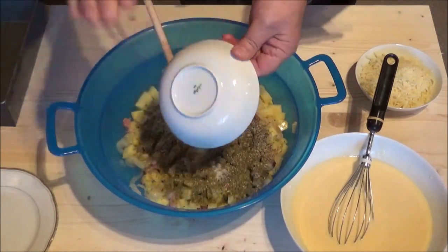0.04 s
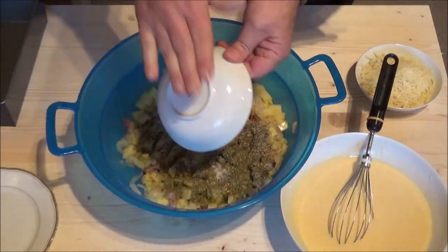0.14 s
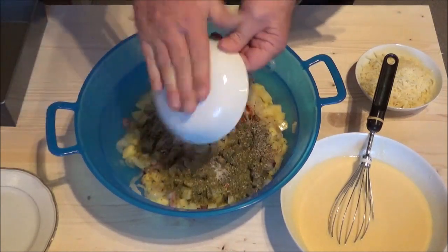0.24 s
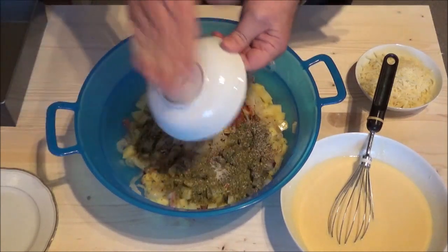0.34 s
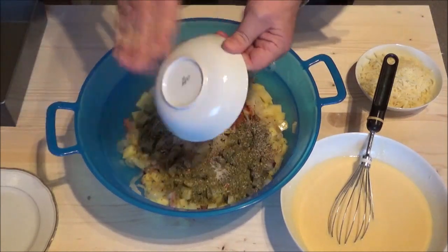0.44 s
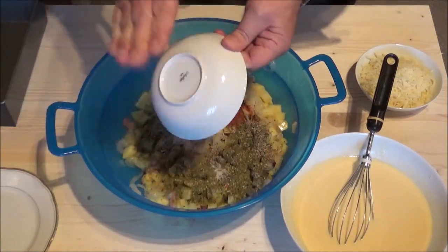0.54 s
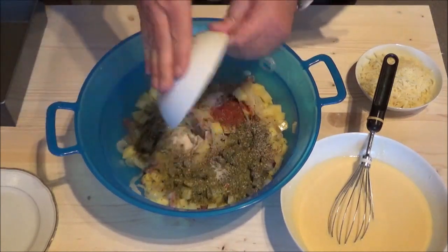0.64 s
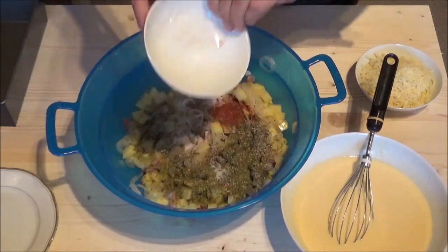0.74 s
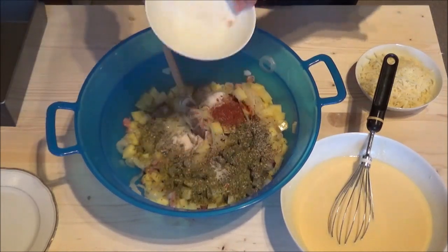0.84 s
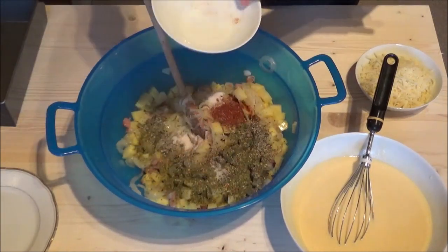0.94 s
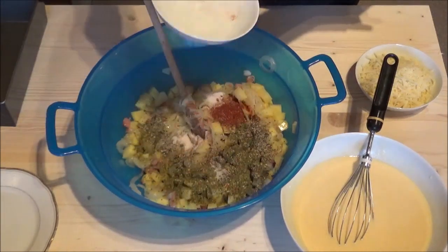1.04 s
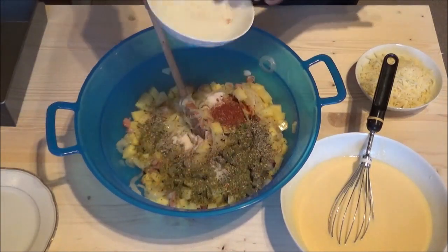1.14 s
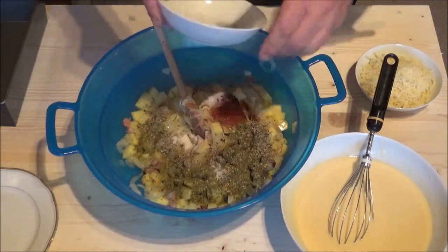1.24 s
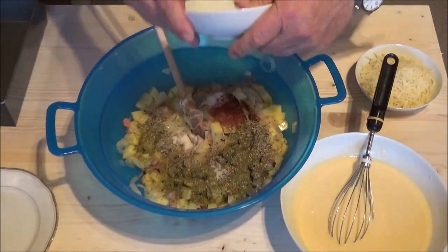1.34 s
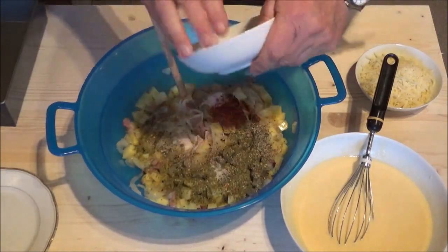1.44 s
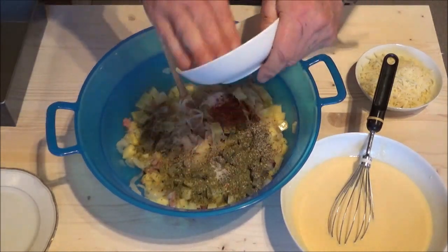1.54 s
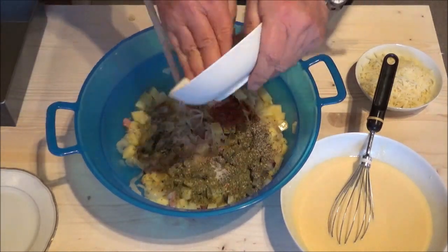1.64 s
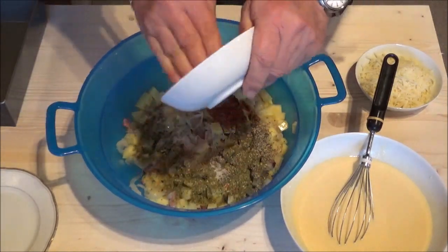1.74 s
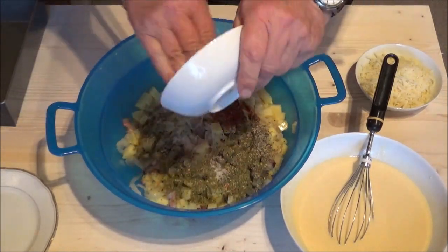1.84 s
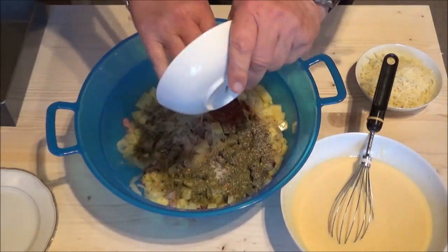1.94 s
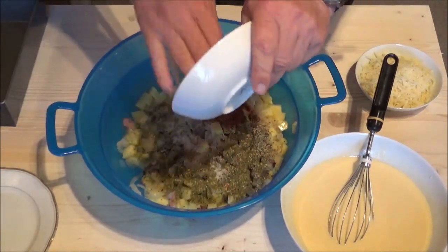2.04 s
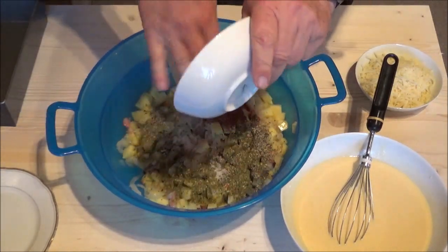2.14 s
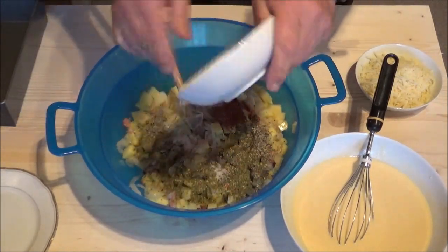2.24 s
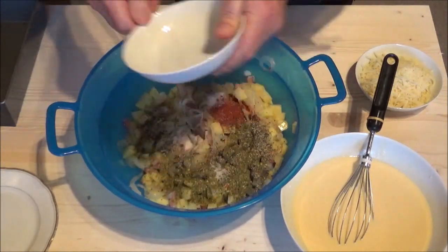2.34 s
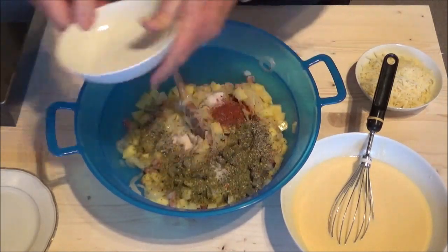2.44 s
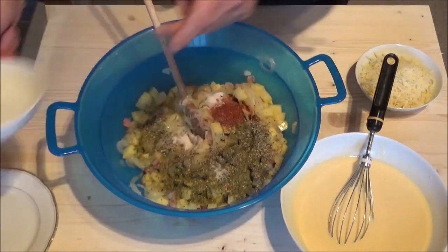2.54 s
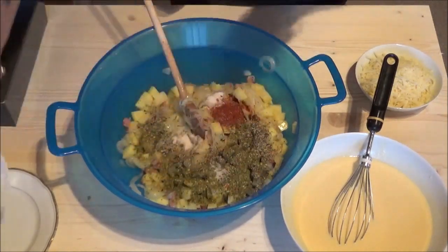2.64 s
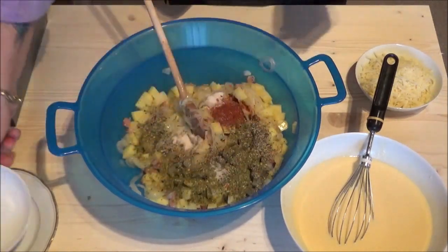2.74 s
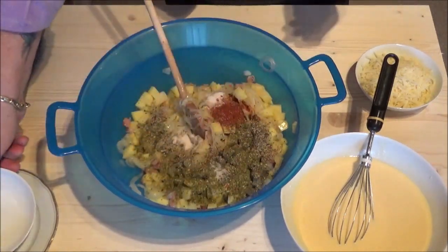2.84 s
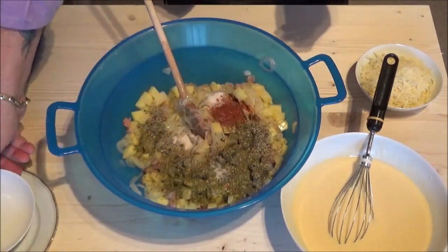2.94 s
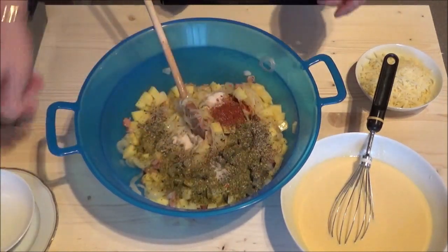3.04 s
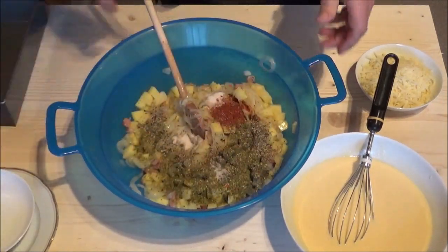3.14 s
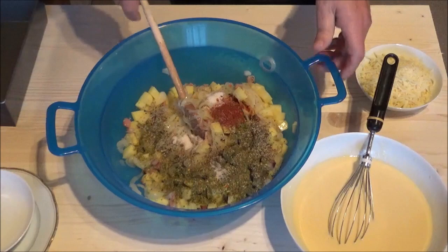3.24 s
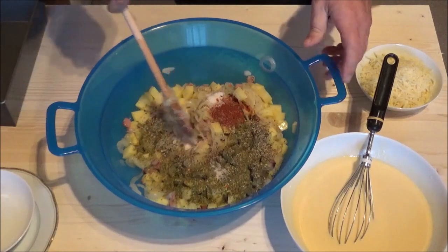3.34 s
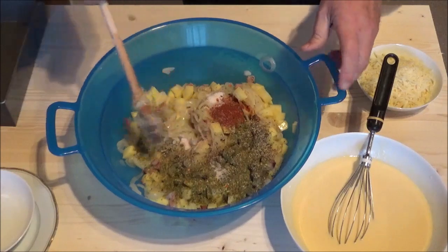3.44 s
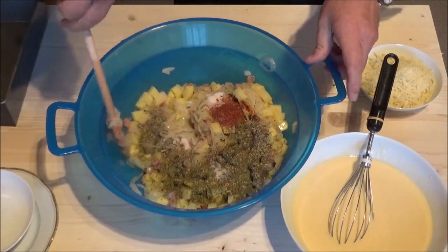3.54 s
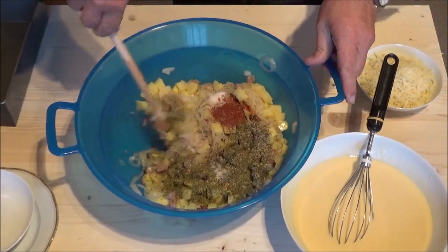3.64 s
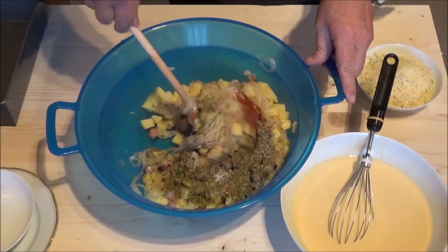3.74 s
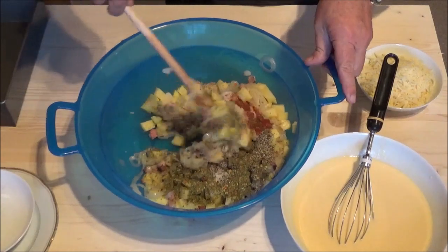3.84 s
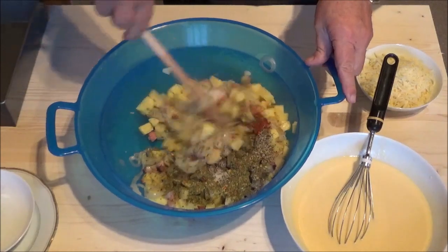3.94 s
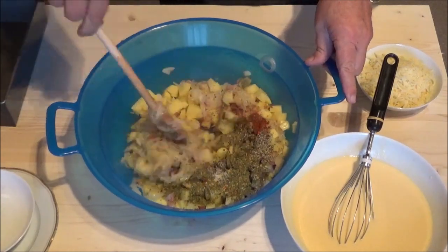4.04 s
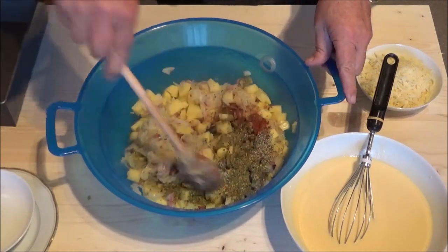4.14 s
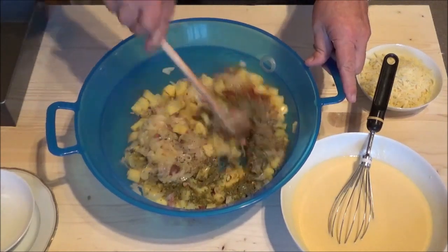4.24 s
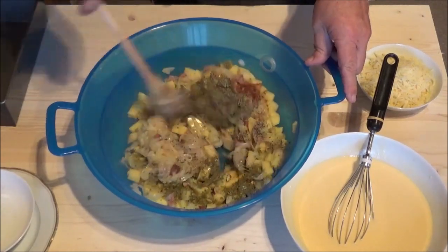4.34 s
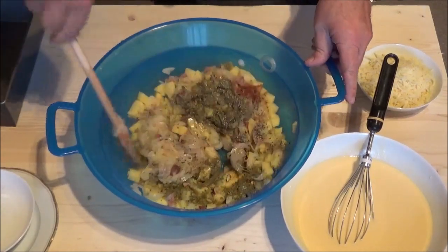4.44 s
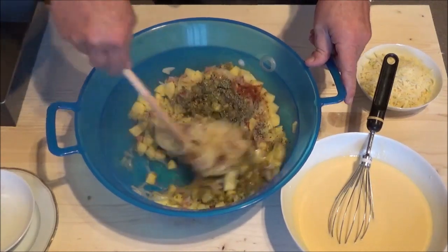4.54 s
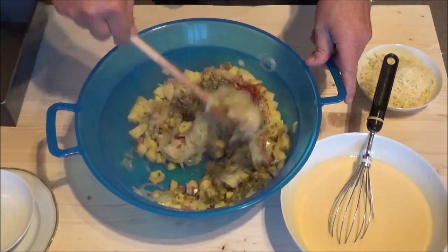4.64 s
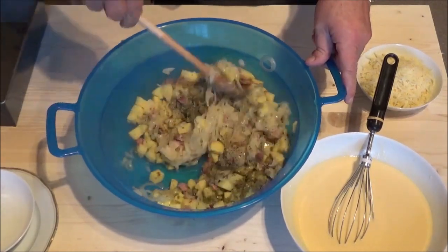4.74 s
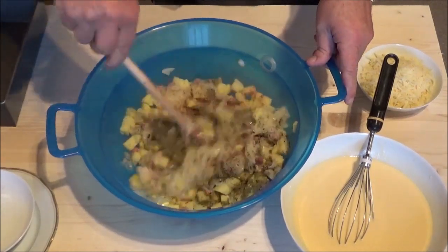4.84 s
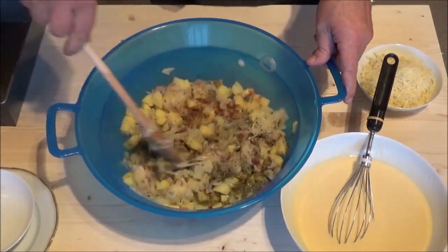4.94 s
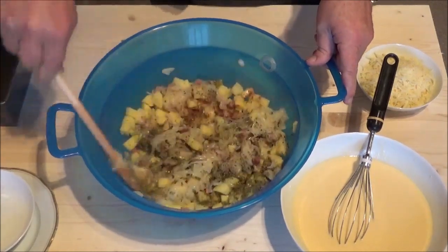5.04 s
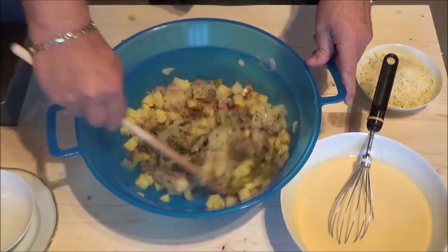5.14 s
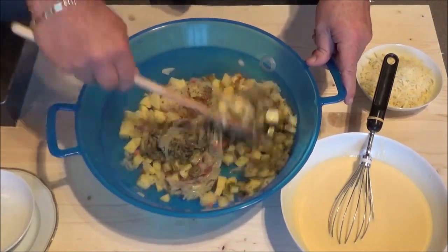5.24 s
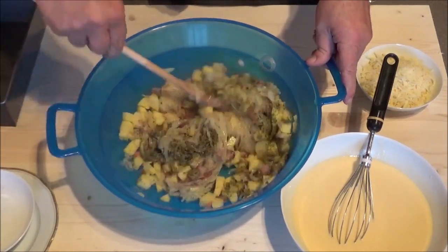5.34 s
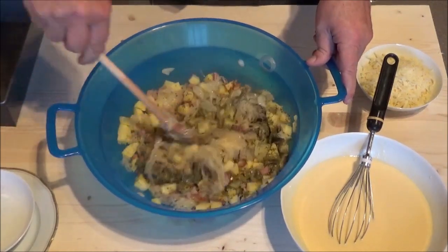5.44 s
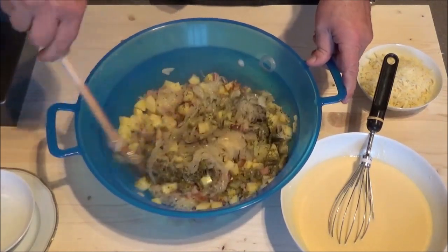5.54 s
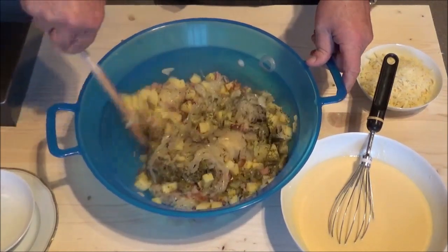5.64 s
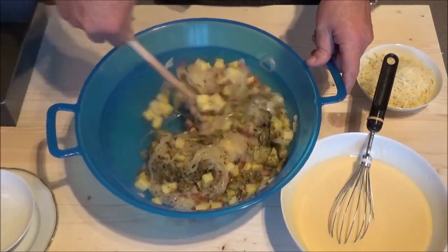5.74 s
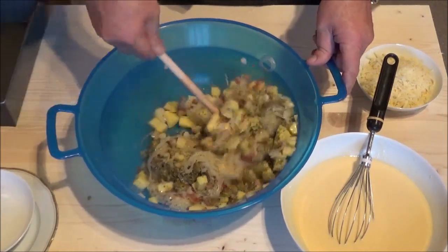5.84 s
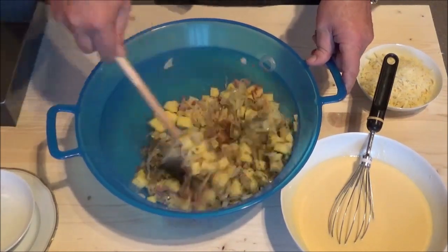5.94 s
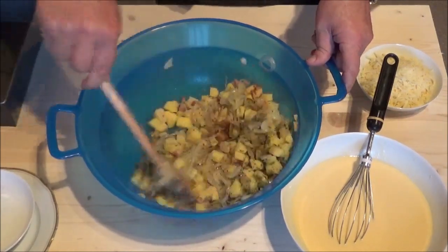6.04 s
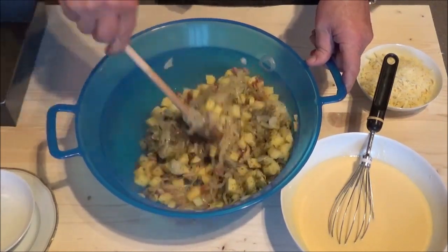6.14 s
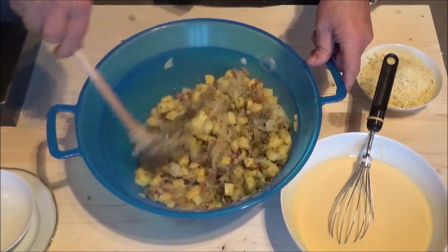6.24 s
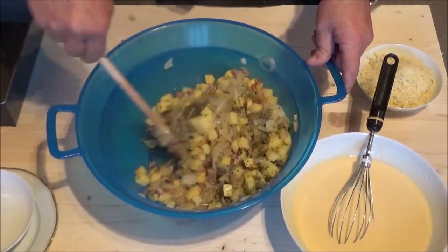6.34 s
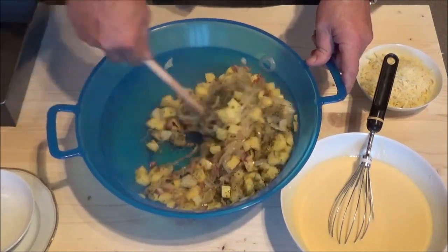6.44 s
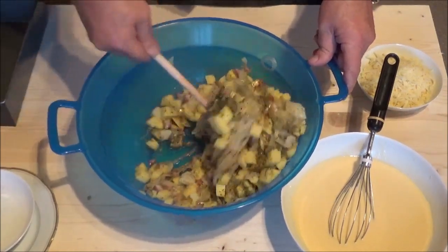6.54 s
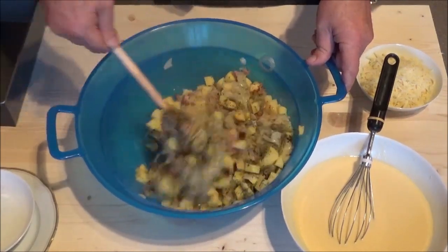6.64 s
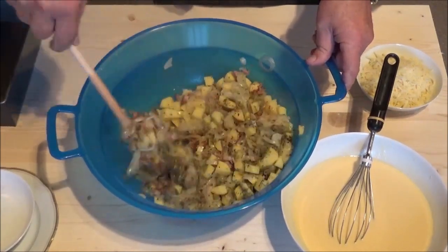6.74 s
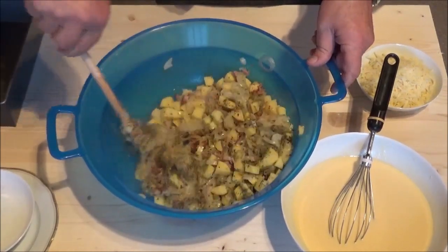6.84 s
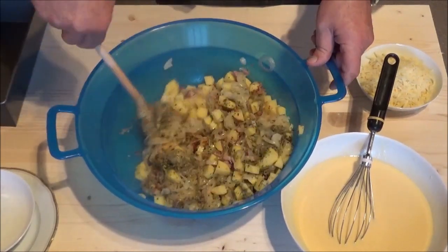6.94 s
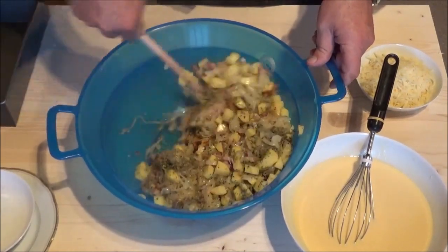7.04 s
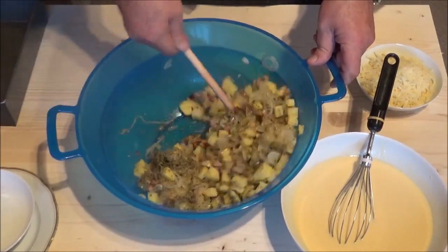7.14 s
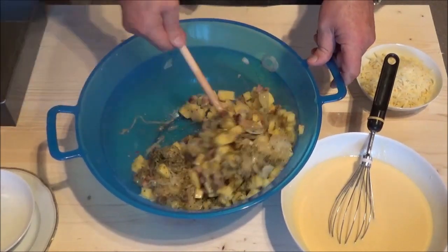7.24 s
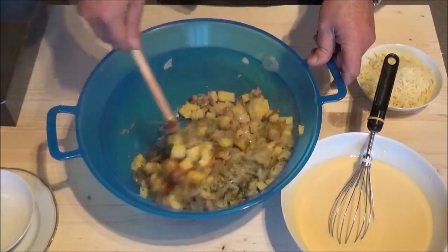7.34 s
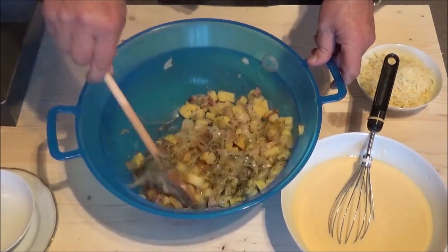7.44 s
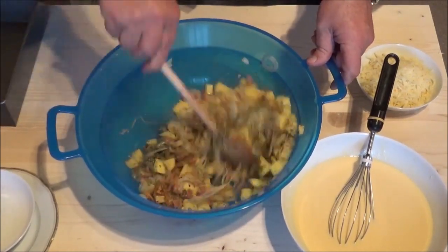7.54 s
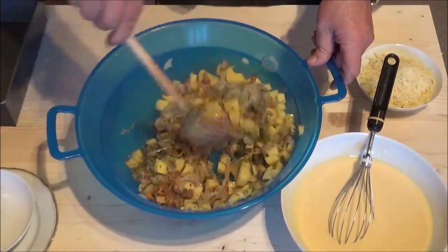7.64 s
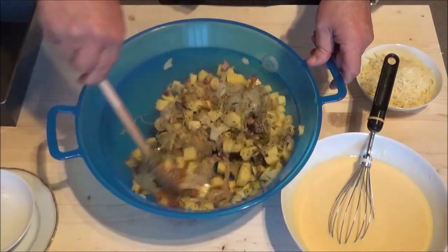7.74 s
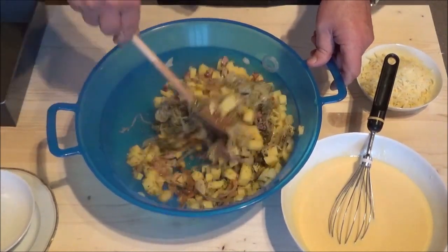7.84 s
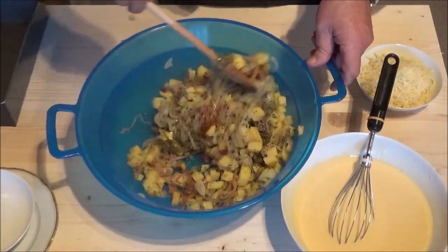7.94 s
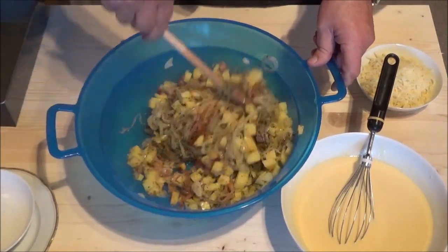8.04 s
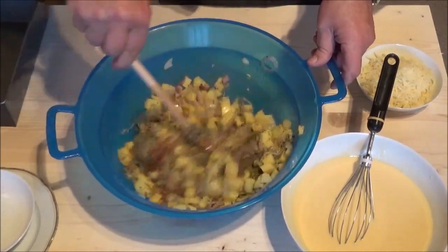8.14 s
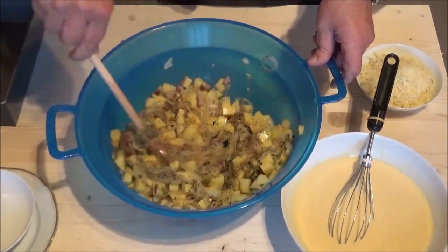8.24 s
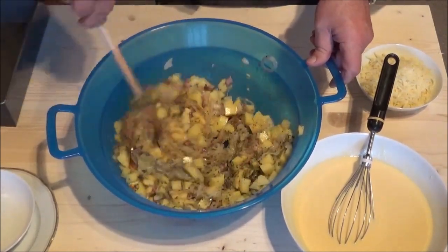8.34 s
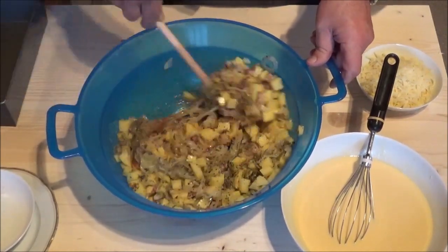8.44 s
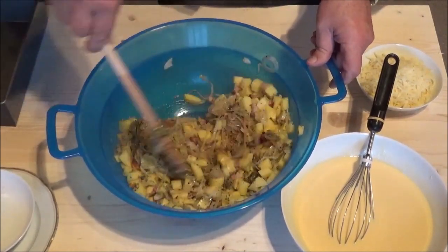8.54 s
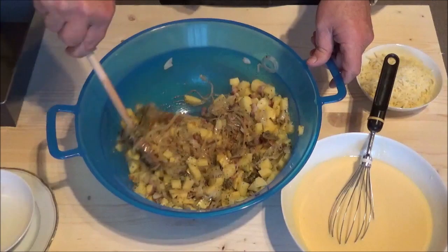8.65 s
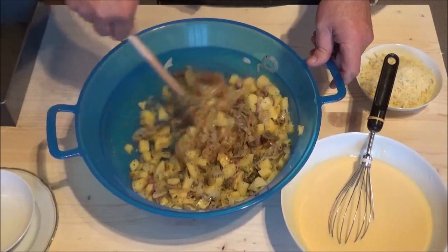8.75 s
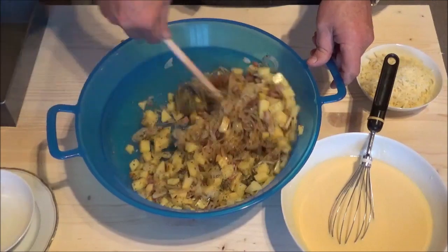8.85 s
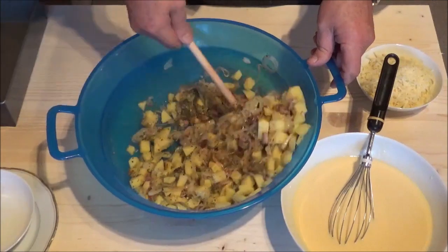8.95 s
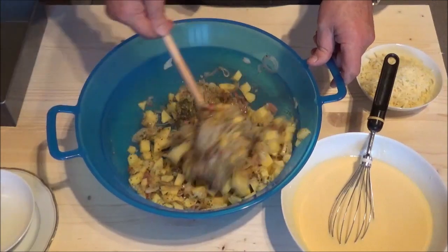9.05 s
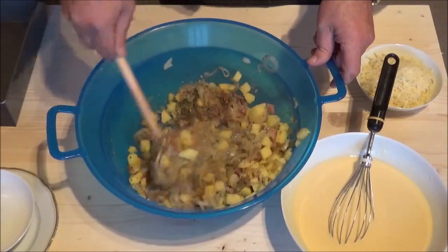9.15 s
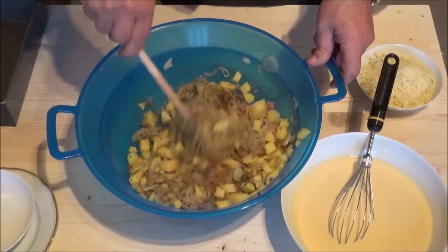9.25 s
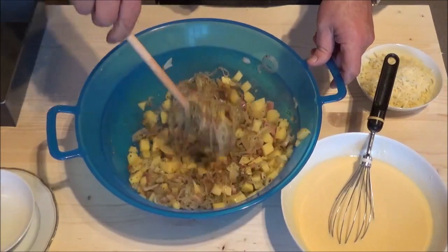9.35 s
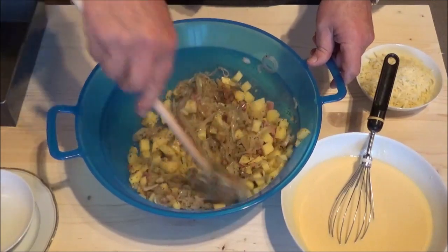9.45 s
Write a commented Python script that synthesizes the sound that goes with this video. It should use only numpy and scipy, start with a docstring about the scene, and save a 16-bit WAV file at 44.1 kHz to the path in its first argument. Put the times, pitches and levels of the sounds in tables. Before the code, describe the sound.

Close stereo in a small kitchen with a short echo and faint steady hiss. From 0.14 to 0.6 seconds, five quick palm slaps crack on an upturned china bowl, about eight a second, ringing hollow with varying tone. A soft wiping rustle follows near 0.76; between 1.0 and 2.2 come faint hollow rubs, a gritty finger slide and a few small china ticks. A thin scratch at 2.65 leads to a bright landing on a plate at 2.8, slightly left, with two rocking taps and a brief rattle to 3.3. From 3.5 to the end near 9.5, a wooden spoon stirs moist diced vegetables in a wide pan: two to four pushes a second, wet crackling squelches, low tumbling, scrapes, gurgles and irregular woody knocks. Stronger knocks come around 5.6, 6.3 and 7.1, juddering scuffs near 5.8-6, a sharp clack at 8.8 and a final firm knock at 9.47.

```python
"""First a hand slaps spices out of an upturned china bowl over a faint hiss: sharp cracks and hollow rings.
Fingers then wipe and tick on the bowl (coloured grains of noise), and it lands on a plate and rattles still.
Last, a wooden spoon stirs moist diced vegetables in a wide pan: cracks and pan rings make the knocks,
crowds of tiny clicks make the squelch, scrape and tumble, and short flurries make the scuffs and gurgles.
All this happens in a small kitchen, whose echo is noise that dies away."""
import sys
import numpy as np
from scipy import signal
from scipy.fft import rfft, irfft
from scipy.io import wavfile

SR = 44100
rng = np.random.default_rng(int(sys.argv[2]) if len(sys.argv) > 2 else 0)


def to_wav(s):
    """Save 16-bit WAV."""
    ch = np.atleast_2d(s).T  # columns
    pcm = np.round(np.clip(ch, -1, 1) * 32767)  # PCM
    wavfile.write(sys.argv[1], SR, pcm.astype(np.int16))


N = 418068
TIME = np.arange(N) / SR  # seconds
RING_TIME = TIME[:16384]

# Levels in the tables are relative: each sound and the room set the final loudness.
# Slaps of the palm on the bowl:
# (t/s, ring level/dB, crack level/dB, boom of the air under the bowl/dB, favoured f/Hz, favour/dB)
SLAPS = [(0.1372, -0.5, -6, -14.5, 1050, 10.5), (0.2708, -5.5, -6.5, 1, 2400, 12),
         (0.385, -0.5, -8.5, 0, 5800, 5.5), (0.4975, -.5, -8.5, 0, 11000, 4),
         (0.601, 2.5, -8.5, -2.5, 1900, 8)]
# Average ring of a slap: (f/Hz, level/dB)
SLAP_RING = [(490, -31.5), (1050, -25.5), (1900, -30), (3400, -26), (5800, -25), (11000, -25.5)]
# Edges of the pitch bands that shape a slap: f/Hz
SLAP_BANDS = [300, 800, 1400, 2600, 4500, 7500, 16000]
# Ringing air between bowl and pan: (f/Hz, level/dB, time to die by 60 dB/s)
HOLLOW_MODES = [(420, 5, .24), (530, -3, .16), (630, 12, .11), (665, 10, .11), (861, 1, .22), (980, 3, .2),
                (1033, 4, .2), (1092, 1, .2), (1200, 0, .22), (1305, -4, .22), (1400, -7, .2),
                (1577, -4, .2), (1771, -5, .2), (1986, -3, .2), (2430, 2, .22), (2704, -5, .2),
                (3400, -4, .18), (5770, -5, .2), (6245, -3, .17)]
# Fingers wiping the bowl, then the bowl shifting on the plate: (peak t/s, rise/s, fall/s, level/dB)
WIPES = [(0.76, 0.057, 0.39, -64.5), (1.33, .7, 0.24, -68), (2.66, 0.4, 1, -64), (3.12, 0.056, 0.36, -56.5),
         (3.37, 0.18, 0.23, -58.5)]
# Colour of the wiping: (f/Hz, level/dB)
WIPE_COLOUR = [(200, -24), (600, -5), (1500, 2.5), (3300, 3), (7000, 0), (16000, -4.5)]
# Fingers tick on the held bowl: (t/s, ring level/dB, crack level/dB, brightness/dB per octave)
TICKS = [(1.0479, -4.5, -21.5, 4), (1.395, -7, -24, 1.5), (1.956, 1, -17, 2.5), (2.0815, 5.5, -14, -1),
         (2.1707, -12, -28, -1)]
# Average ring of a tick: (f/Hz, level/dB)
TICK_RING = [(420, -64), (1500, -47), (3900, -40.5), (7300, -49), (12000, -39.5)]
# Ringing of the held bowl: (f/Hz, level/dB, time to die by 60 dB/s)
HELD_BOWL_MODES = [(1567, -18, 0.17), (4200, 7, 0.096), (6300, -11, .1), (10200, -3, 0.11), (13990, -7, .1)]
# Edges of the pitch bands that shape ticks and landings: f/Hz
CHINA_BANDS = [200, 900, 2500, 6000, 9000, 16000]
# Faint hollow rubbing as the bowl is turned over: (peak t/s, rise/s, fall/s, level/dB)
RUBS = [(1.11, 0.15, 0.069, -63.5), (1.32, 0.22, 0.082, -66.5), (1.44, .1, 0.11, -67)]
# Colour of the rubbing: (f/Hz, level/dB)
RUB_COLOUR = [(400, -32), (600, -19), (690, 1), (800, -16), (1400, -11), (2200, -18), (3300, -8),
              (5000, -28), (9000, -49)]
# A finger slides on the china with a thin gritty scratch: (peak t/s, rise/s, fall/s, level/dB)
SLIDES = [(1.41, 0.027, .06, -64), (2.645, 0.033, 0.042, -54.5)]
# The bowl lands on the plate and rocks: (t/s, ring level/dB, crack level/dB, brightness/dB per octave)
LANDINGS = [(2.8245, 1, -2.5, 0), (2.955, -12.5, -13, -3.5), (3.008, -13, 1.5, -3)]
# Average ring of a landing: (f/Hz, level/dB)
LANDING_RING = [(420, -35), (1500, -25), (3900, -20.5), (7300, -20), (12000, -22.5)]
# Ringing of bowl and plate together: (f/Hz, level/dB, time to die by 60 dB/s)
CHINA_MODES = [(600, -7, .14), (1028, -12, .14), (1285, -9, .12), (1400, -9, .12), (1530, -4, .15),
               (2150, -19, .35), (2643, -11, .14), (3187, -9, .19), (4560, -2, .09), (4790, 3, .1),
               (4920, 3, .12), (5227, -14, .2), (7370, -4, .07), (7620, 1, .08), (7741, 1, .12),
               (7820, -1, .1), (10020, -8, .1), (10290, -2, .14), (11440, -4, .14), (12480, -4, .18),
               (13110, -11, .2)]
# The bowl settles on the plate: (peak t/s, rise/s, fall/s, level/dB)
RATTLES = [(3.115, 0.031, 0.13, -54.5), (3.2, .05, 0.12, -63)]
# Colour of the settling: (f/Hz, level/dB)
RATTLE_COLOUR = [(400, -13), (1500, 1), (2700, 6), (4800, -17), (9000, -22)]
# Sharp clacks of the spoon's edge and pops of wet food: (t/s, level/dB, f/Hz)
CLICKS = [(3.274, -33, 9200), (3.3415, -30, 7000), (3.842, -29, 13300), (3.9306, -31, 5840),
          (4.218, -24.5, 3820), (4.6037, -24.5, 6350), (5.429, -26, 5870), (5.5594, -30, 12300),
          (5.7504, -15, 3700), (5.8099, -16, 1860), (6.426, -20.5, 2550), (6.8528, -27, 14600),
          (6.9149, -15.5, 5400), (6.9697, -19.5, 6030), (7.4275, -24.5, 11500), (7.8212, -20, 4000),
          (8.6071, -26, 12800), (8.8322, -6, 2940), (9.0814, -20.5, 9800), (9.3377, -28, 10200)]
# Spoon knocks on the pan: (t/s, ring level/dB, hardness of the contact/dB, thud into the table/dB)
KNOCKS = [(3.524, -47.5, 8, 7), (3.5548, -40.5, -1, -5), (3.6352, -39, 3.5, 2), (3.7421, -50, 0, 5),
          (3.7583, -43, -6, -2), (3.8961, -43, -7, 3), (3.9956, -39, 0, -7), (4.111, -53.5, -15, 7),
          (4.493, -49, 4, 3), (4.5172, -58.5, 15, 28.5), (4.6149, -34, -19, -5.5), (4.7022, -55, 6, 25),
          (5.158, -39.5, -10, 9), (5.2001, -46, -16, 12), (5.352, -50.5, 3, 11), (5.5342, -55, -11, -9),
          (5.6118, -29.5, 1.5, -8.5), (5.777, -38.5, -16, -9), (5.809, -40.5, 6.5, -15),
          (5.909, -36.5, -12, -3), (5.958, -42, -7, -15), (5.984, -40, -14, 5), (6.086, -45.5, 4, -10),
          (6.158, -45, -7, -3), (6.326, -32.5, 5.5, 4), (6.3843, -38.5, 4, -6), (6.4266, -42, 6, -5),
          (6.481, -42.5, -4, 9), (6.615, -40.5, -6.5, 13.5), (6.6957, -38, -2, 13), (6.7714, -47.5, -4, 6),
          (6.9113, -46, 9, 9.5), (7.057, -34, 2, 1.5), (7.125, -40, -8, -13), (7.402, -45, 1.5, 1),
          (7.6079, -36.5, -7, -2.5), (7.7412, -51, -5, 16), (7.778, -53.5, 0, 18.5), (7.8233, -37.5, 7, -1),
          (7.8759, -41, -12, -16), (7.9236, -41, -8, 10), (8.066, -38.5, 0.5, 11.5), (8.34, -49, 3, 10.5),
          (8.763, -43.5, -3, 4), (8.832, -37, 8.5, 9), (9.0453, -45.5, -2, 7), (9.1358, -50.5, -7, 9),
          (9.2952, -47, -18, 12.5), (9.467, -29.5, 2.5, 2)]
# Average ring of a knock: (f/Hz, level/dB)
KNOCK_RING = [(240, -28), (620, -13), (1050, -0.5), (1840, -9.5), (3950, -8)]
# How much of the hardness each pitch gets: (f/Hz, share)
HARD_SHARE = [(1050, 0.036), (1840, 0.57), (3950, 1)]
# How much of the thud each pitch gets: (f/Hz, share)
THUD_SHARE = [(240, 1), (620, 0.77), (1050, 0.071)]
# Edges of the pitch bands that shape a knock: f/Hz
PAN_BANDS = [130, 450, 850, 1300, 2600, 6000]
# Ringing of the pan, damped by its food: (f/Hz, level/dB, time to die by 60 dB/s)
PAN_MODES = [(260, -2, 0.081), (428.6, -10.5, 0.19), (507, -12.5, 0.1), (622.5, -3, 0.12),
             (686.5, 1.5, 0.077), (831.6, -4.5, 0.17), (1010.3, 9, 0.085), (1016, -1.5, 0.099),
             (1230, 2.5, 0.069), (1423, -4.5, 0.086), (1662, -1, 0.058), (1870, -14.5, 0.091),
             (2370, -26, 0.055)]
# Pushes of the spoon through the food: (peak t/s, rise/s, fall/s, squelch level/dB, scrape level/dB)
PUSHES = [(3.66, 0.2, 0.21, -47.5, -64), (3.77, 0.25, 0.18, -53.5, -55.5), (3.986, 0.12, 0.11, -45.5, -53),
          (4.243, 0.084, 0.2, -46, -59.5), (4.524, 0.097, 0.26, -45.5, -53),
          (4.855, 0.16, 0.12, -42.5, -54.5), (5.16, 0.27, 0.46, -51, -59), (5.40, 0.27, 0.18, -47.5, -58),
          (5.67, 0.044, 0.25, -44.5, -49), (5.815, 0.23, 0.16, -48.5, -54),
          (5.975, .08, 0.13, -55.5, -43.5), (6.11, 0.09, .18, -45, -56), (6.345, 0.058, 0.36, -44, -50.5),
          (6.47, 0.14, 0.39, -52, -57), (6.71, 0.23, 0.33, -56.5, -64), (6.96, 0.24, 0.42, -50, -64),
          (7.07, 0.059, 0.34, -46.5, -53), (7.42, 0.29, 0.059, -61, -54), (7.59, 0.21, 0.091, -43.5, -54.5),
          (7.808, 0.083, 0.14, -40, -50), (8.01, 0.096, 0.18, -51, -64), (8.13, 0.16, 0.2, -42.5, -57),
          (8.362, 0.15, 0.25, -44.5, -57), (8.75, 0.17, 0.2, -44, -58), (8.845, 0.088, 0.31, -49, -55),
          (9.07, 0.11, 0.11, -52, -50.5), (9.244, 0.11, 0.1, -44, -55.5),
          (9.47, 0.038, 0.091, -41.5, -43.5)]
# Colour of the squelching: (f/Hz, level/dB)
SQUELCH_COLOUR = [(710, -35.5), (1200, -6.5), (2790, -4.5), (3550, -3.5), (7010, -3.5), (9640, -2),
                  (11000, -4.5), (14900, -2.5), (16000, -4), (16500, -36)]
# Colour of the scraping: (f/Hz, level/dB)
SCRAPE_COLOUR = [(200, -25), (450, -2), (700, 1.5), (1100, 0.5), (2000, -4.5), (3500, -7), (7000, -21),
                 (16000, -22)]
# Colour of the tumbling dice: (f/Hz, level/dB)
TUMBLE_COLOUR = [(20, -31), (70, -20), (130, -18), (240, 6), (400, 1.5), (700, -30), (2000, -38)]
# Squeezed pockets of moisture gurgle: (peak t/s, rise/s, fall/s, level/dB, f/Hz)
GURGLES = [(3.555, 0.034, 0.04, -49, 3600), (4.25, 0.064, 0.067, -54, 3500), (4.85, .06, 0.051, -45, 3770),
           (5.17, .05, 0.097, -59, 2400), (6.13, .05, .06, -47, 4200), (7.56, 0.06, 0.072, -53.5, 2600),
           (8.12, .04, 0.061, -47, 3000), (8.36, .05, .08, -49, 3500)]
# The spoon's edge judders over a bare patch of pan: (peak t/s, rise/s, fall/s, level/dB, f/Hz)
SCUFFS = [(3.765, 0.037, 0.05, -43.5, 1130), (3.889, 0.037, 0.032, -52, 1350),
          (4.621, .02, 0.078, -47, 1400), (5.165, 0.018, 0.052, -49, 1400),
          (5.812, 0.047, 0.059, -39.5, 1720), (5.915, 0.02, 0.037, -41.5, 1420),
          (5.975, 0.033, 0.066, -40, 1580), (6.43, .02, 0.027, -44, 1900), (6.484, 0.025, 0.043, -42, 1570),
          (6.705, 0.018, 0.071, -49, 900), (6.775, .015, 0.059, -52, 1330),
          (7.409, 0.036, 0.078, -47.5, 1470), (7.88, .04, 0.1, -48.5, 1110),
          (8.126, 0.023, 0.047, -47, 1500), (9.145, .012, 0.024, -57.5, 1480)]
# Colour of the faint steady hiss: (f/Hz, level/dB)
AIR_COLOUR = [(30, -47), (100, -25), (200, -15), (400, -8.5), (680, -2), (1500, -1.5), (3000, -2),
              (5500, -2), (9000, -4.5), (16000, -7.5)]
# Echo of the kitchen: (f/Hz, time to die by 60 dB/s)
KITCHEN_FADE = [(150, 0.18), (500, 0.33), (1400, 0.28), (4000, 0.3), (9000, 0.27), (16000, 0.22)]
# Difference between left and right: (f/Hz, level/dB)
WIDTH = [(100, -14), (400, -25), (1100, -14.5), (1600, -8.5), (2800, -6.5), (5500, -10), (9000, -10),
         (15000, -12)]

AIR_DB = -66.5  # hiss, before the room is added
# A movement climbs and sinks this far in its rise and fall times; a shape above 1 rounds the peak.
SWELL_DB, SWELL_SHAPE = 25, 1.186
RESTING_DB = -70.5  # the food keeps seeping between pushes
TUMBLE_DB = -21.5  # tumbling, against the mean of squelch and scrape
EDGE_HZ = 16100  # highest pitch kept


def amp(db):
    """Turns decibels into a gain."""
    return 10 ** (np.asarray(db) / 20)


def unit(x):
    """Scales to an energy of one."""
    return x / np.sqrt(np.sum(x ** 2) + 1e-20)


def steady(x):
    """Scales to an average strength (rms) of one."""
    return unit(x) * np.sqrt(len(x))


def read(points, hz):
    """Reads a table between its points, on a log-pitch axis."""
    f, value = np.transpose(points)
    return np.interp(np.log(hz + 1), np.log(f), value)


def middles(edges):
    """Gives the middle pitch of each band."""
    return np.sqrt(np.multiply(edges[:-1], edges[1:]))


def add(mix, s, sound):
    """Adds a sound to the mix at time s."""
    part = mix[..., round(s * SR):][..., :sound.shape[-1]]
    part += sound[..., :part.shape[-1]]


def through(x, response):
    """Sets off the response at every sample of x (convolution), keeping the length."""
    return signal.oaconvolve(x, response)[:len(x)]


def colour(x, points):
    """Filters to the given spectrum without sounding early, so that attacks stay sharp."""
    hz = abs(np.fft.fftfreq(2048, 1 / SR))
    log_gain = np.log(amp(read(points, hz)))
    # the Hilbert transform finds the phase that puts the energy as early as possible
    spectrum = np.exp(np.conj(signal.hilbert(log_gain)))
    return through(x, np.fft.ifft(spectrum).real)


def swell(t, rise, fall, db):
    """Gain of one movement, rising to its peak at time zero and falling away."""
    away = np.maximum(-t / abs(rise), t / abs(fall))
    return amp(db - SWELL_DB * np.minimum(away, 9) ** SWELL_SHAPE)


def swells(rows):
    """Gain of a series of movements, their energies added."""
    t = TIME[::32]
    energy = sum(swell(t - s, *shape) ** 2 for s, *shape in rows)
    return np.interp(TIME, t, np.sqrt(energy))


def clumps(depth_db, seconds):
    """A gain that wanders at random, with one new value every given time."""
    knots = np.arange(0, TIME[-1] + 1, seconds)
    return np.interp(TIME, knots, amp(depth_db * rng.standard_normal(len(knots))))


def grains(per_s, range_db):
    """Random clicks, mostly small and a few large, with an rms of one."""
    size = amp(range_db * np.minimum(rng.exponential(1, N), 4.5))
    sign = rng.choice([-1, 1], N)
    happens = rng.random(N) < per_s / SR
    return steady(size * sign * happens)


def burst(t60):
    """Dying noise of energy one: many small ringing modes too close to tell apart."""
    return unit(rng.standard_normal(len(RING_TIME)) * amp(-60 * RING_TIME / t60))


def ring(modes, dense_db, dense_t60, split):
    """Clusters of close modes, a little different with each contact, over a wash of small dense ones."""
    hz, db, t60 = np.tile(np.transpose(modes), 3)[:, :, None]  # three close tones for each mode
    size, phase, detune = rng.standard_normal((3, len(hz), 1))
    t = RING_TIME[:10000]
    level = amp(db + 2 * size - 60 * t / t60)
    tones = level * np.sin(2 * np.pi * hz * (1 + split * detune) * t + np.pi * phase)
    return unit(tones.sum(0)) + amp(dense_db) * burst(dense_t60)[:len(t)]


def weigh(x, edges, levels_db, bass_db, top_db):
    """Gives the first 30 ms of a blow its level in each band; bass_db and top_db set the gain beyond."""
    head = x[:SR * 3 // 100]
    power = np.cumsum(abs(rfft(head, SR // 10)) ** 2) * 20 / (SR * len(head))
    band_power = np.diff(power[np.array(edges) // 10])  # one step is 10 Hz
    gains = levels_db - 10 * np.log10(band_power)
    below = (edges[0] / 2, gains[0] + bass_db)
    above = (edges[-1] * 2, gains[-1] + top_db)
    return colour(x, [below, *zip(middles(edges), gains), above])


def crack(hz, spread, length):
    """A very short hard contact: noise around one pitch (spread in octaves), with a peak near one."""
    u = RING_TIME[:512] / length  # length in seconds
    f = np.fft.rfftfreq(len(u), 1 / SR)
    band = np.exp(-.5 * (np.log2((f + 1) / hz) / spread) ** 2)
    noise = irfft(band * np.exp(2j * np.pi * rng.random(len(f))))
    return unit(noise * u * np.exp(-u)) * np.sqrt(length * SR)


def blows(rows, modes, edges, ring_db, crack_db, crack_hz, spread, length,
          dense_db, dense_t60, split, rise, lag, bass_db, top_db):
    """Each blow is a contact crack with the ring of the struck thing; rise and lag are in seconds."""
    out = np.zeros(N)
    for s, hard_db, *levels_db in rows:
        body = ring(modes, dense_db, dense_t60, split)
        body = body * (1 - np.exp(-TIME[:len(body)] / rise))
        add(out, s + lag, amp(ring_db) * weigh(body, edges, np.array(levels_db), bass_db, top_db))
        add(out, s + lag, amp(hard_db + crack_db) * crack(crack_hz, spread, length))
    return out


def bursts(rows, per_s, octaves, length):
    """Short flurries of uneven taps, each flurry around its own pitch."""
    out = np.zeros(N)
    t = RING_TIME
    lead = t[-1] / 2  # puts the peak in the middle of the flurry
    for s, rise, fall, db, hz in rows:
        clicks = rng.standard_normal(len(t)) * (rng.random(len(t)) < per_s / SR)
        taps = steady(through(clicks, crack(hz, octaves, length)))
        add(out, s - lead, taps * swell(t - lead, rise, fall, db))
    return out


def air():
    """Faint steady hiss: coloured noise."""
    return amp(AIR_DB) * steady(colour(rng.standard_normal(N), AIR_COLOUR))


def slap_force(s, db, crack_db, boom_db, favoured_hz, favoured_db):
    """The palm favours one range of the bowl's ring; the air beneath booms in the lowest band."""
    hz = middles(SLAP_BANDS)
    octaves = 0.39  # width of the favoured range
    favour = favoured_db * np.exp(-.5 * (np.log2(hz / favoured_hz) / octaves) ** 2)
    boom = boom_db * (hz == hz[0])
    return s, crack_db, *(db + read(SLAP_RING, hz) + favour + boom)


def slaps():
    """Slaps on the upturned bowl crack and set the air beneath it ringing."""
    return blows([slap_force(*row) for row in SLAPS], HOLLOW_MODES, SLAP_BANDS,
                 ring_db=-10.5, crack_db=-2.5, crack_hz=6040, spread=1.0, length=0.00037,
                 dense_db=9.5, dense_t60=0.21, split=0.0034, rise=0.00034, lag=0.00044,
                 bass_db=-24, top_db=-28)


def wipe():
    """Wiping and shifting china make crowds of tiny contacts, heard as a soft rustle."""
    return steady(colour(grains(2500, 2.7), WIPE_COLOUR)) * swells(WIPES)


def china_force(spectrum, s, db, crack_db, brightness):
    """A sharper touch tilts the china's ring towards the treble, around 3900 Hz."""
    hz = middles(CHINA_BANDS)
    return s, crack_db, *(db + read(spectrum, hz) + brightness * np.log2(hz / 3900))


def ticks():
    """Fingers tick on the bowl; the hand damps it, so small dense modes outweigh the clear ones."""
    return blows([china_force(TICK_RING, *row) for row in TICKS], HELD_BOWL_MODES, CHINA_BANDS,
                 ring_db=-17.5, crack_db=-16.5, crack_hz=7400, spread=0.82, length=0.00029,
                 dense_db=5, dense_t60=0.045, split=0.015, rise=0.00024, lag=0.00092,
                 bass_db=-32, top_db=5)


def rub():
    """Rubbing makes grains of contact, coloured hollow by a peak near 690 Hz."""
    return steady(colour(grains(1500, 3.0), RUB_COLOUR)) * swells(RUBS)


def slide():
    """A sliding finger catches unevenly on the china in many tiny cracks."""
    scratch = through(grains(per_s=2000, range_db=7.5), crack(hz=4200, spread=0.4, length=0.001))
    return steady(scratch) * swells(SLIDES)


def landing():
    """China lands on china and rocks twice: each contact cracks and rings."""
    return blows([china_force(LANDING_RING, *row) for row in LANDINGS], CHINA_MODES, CHINA_BANDS,
                 ring_db=-7, crack_db=-15, crack_hz=4850, spread=.3, length=0.00054,
                 dense_db=-3.5, dense_t60=.15, split=.008, rise=0.00026, lag=0.00045,
                 bass_db=-28.5, top_db=-34)


def settling():
    """Tiny contacts of china on china as the bowl comes to rest."""
    china = ring(CHINA_MODES, dense_db=4, dense_t60=0.023, split=0.0055)
    contacts = through(grains(per_s=230, range_db=1.5), china)
    return steady(colour(contacts, RATTLE_COLOUR)) * swells(RATTLES)


def clacks_and_pops():
    """The spoon's edge clacks and pockets of moisture pop: single short cracks."""
    out = np.zeros(N)
    for s, db, hz in CLICKS:
        add(out, s + 0.00061, amp(db - 10) * crack(hz, spread=0.41, length=0.00067))
    return out


def knock_force(s, db, hardness_db, thud_db):
    """Bare wood cracks and rings bright, food cushions it; a downward knock thuds."""
    hz = middles(PAN_BANDS)
    hard = hardness_db * read(HARD_SHARE, hz)
    thud = thud_db * read(THUD_SHARE, hz)
    return s, db + hardness_db, *(db + read(KNOCK_RING, hz) + hard + thud)


def knocks():
    """Wood knocks on the pan and sets its damped modes ringing."""
    return blows([knock_force(*row) for row in KNOCKS], PAN_MODES, PAN_BANDS,
                 ring_db=-6, crack_db=0.5, crack_hz=4800, spread=1.1, length=0.00096,
                 dense_db=3, dense_t60=0.13, split=0.021, rise=0.00045, lag=.0007,
                 bass_db=-17, top_db=-28)


def squelch(squeeze):
    """Countless wet contacts part and close; pockets of each size burst in their own clumps."""
    pops = np.zeros(N)
    for hz in np.geomspace(1300, 15000, num=16):
        pop = unit(crack(hz, spread=.35, length=.0002))
        pops += np.sqrt(hz) * clumps(3.5, .025) * through(grains(per_s=150, range_db=3.7), pop)
    crackle = amp(-4) * unit(grains(per_s=7000, range_db=2.8))
    wet = (unit(pops) + crackle) * clumps(1.5, .012)
    return steady(colour(wet, SQUELCH_COLOUR)) * squeeze


def scrape(drag, resting):
    """The spoon slips over eight spots of the pan, each with its own ring."""
    slips = np.zeros(N)
    for spot in range(8):
        spot_ring = ring(PAN_MODES, dense_db=5.5, dense_t60=0.025, split=0.0406)
        slips += through(grains(per_s=66, range_db=4.5), spot_ring)
    return steady(colour(slips, SCRAPE_COLOUR)) * np.hypot(drag, amp(-3.5) * resting)


def tumble(squeeze, drag):
    """Dull bumps of the dice, loudest when both squelch and scrape are strong."""
    bumps = steady(colour(grains(per_s=380, range_db=3), TUMBLE_COLOUR))
    return amp(TUMBLE_DB) * bumps * np.sqrt(squeeze * drag)


def food():
    """Each push squeezes the food, drags the spoon on the pan and tumbles the dice."""
    pushes = np.array(PUSHES)
    resting = amp(RESTING_DB) * (TIME > KNOCKS[0][0])  # starts with the first knock
    squeeze = np.hypot(swells(pushes[:, :4]), resting)
    drag = swells(np.delete(pushes, 3, axis=1))  # leaves out the squelch level
    return squelch(squeeze) + scrape(drag, resting) + tumble(squeeze, drag)


def gurgles():
    """Squeezed food bubbles in quick short taps, 0.57 octaves wide."""
    return bursts(GURGLES, per_s=770, octaves=0.57, length=0.00047)


def scuffs():
    """The spoon slips in quick dull woody taps, 0.34 octaves wide."""
    return bursts(SCUFFS, per_s=450, octaves=0.34, length=0.0011)


def tail():
    """The small room's echo: noise from 4 ms on, each pitch dying at its own rate."""
    hz, t, z = signal.stft(rng.standard_normal(len(RING_TIME)), SR, nperseg=256)
    fade = -60 * t / read(KITCHEN_FADE, hz)[:, None]
    echo = signal.istft(z * amp(fade), SR, nperseg=256)[1][:len(RING_TIME)]
    return unit(echo * (RING_TIME > .004))


def kitchen(x, wet_db, near_db, side_db):
    """Direct sound and room at two close microphones, which differ most near 3 kHz."""
    mid = x + amp(wet_db) * through(x, tail())
    late = np.pad(x, (SR // 2000, 0))[:N]  # a copy half a millisecond late
    side = colour(amp(near_db) * late + amp(side_db) * through(x, tail()), WIDTH)
    return np.array([mid + side, mid - side])


def scene():
    """The pan is almost straight ahead, the plate a little to the left."""
    bowl = slaps() + wipe() + ticks() + rub() + slide()
    spices = kitchen(air() + bowl, wet_db=-14.5, near_db=1, side_db=-4)
    china = kitchen(landing() + settling(), wet_db=-9, near_db=-3, side_db=-7)
    spoon_and_food = clacks_and_pops() + knocks() + food() + gurgles() + scuffs()
    stirring = kitchen(spoon_and_food, wet_db=-9.5, near_db=-9.5, side_db=-4)
    # dB up on the left and down on the right
    plate_place, pan_place = amp([[1.4], [-1.4]]), amp([[.15], [-.15]])
    return china * plate_place + (spices + stirring) * pan_place


def record(dry):
    """Takes away the pitches above the band limit."""
    lowpass = signal.firwin(301, EDGE_HZ, window=("kaiser", 8), fs=SR)
    return signal.oaconvolve(dry, lowpass[None], "same")


dry = scene()
out = record(dry)
to_wav(out)
```